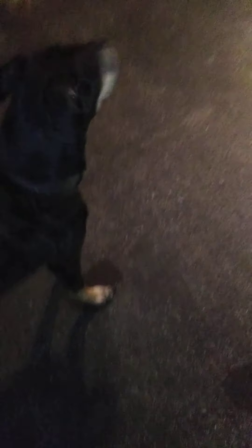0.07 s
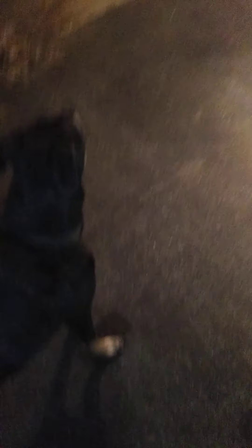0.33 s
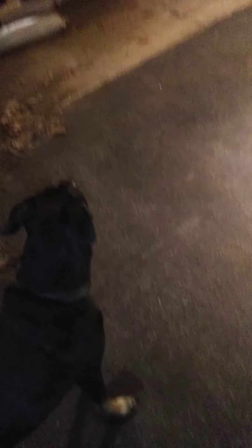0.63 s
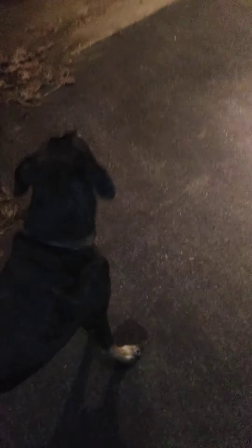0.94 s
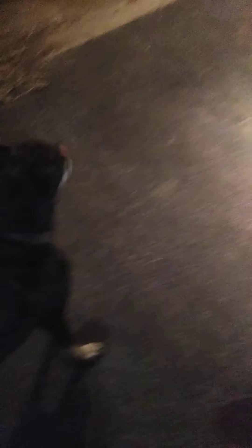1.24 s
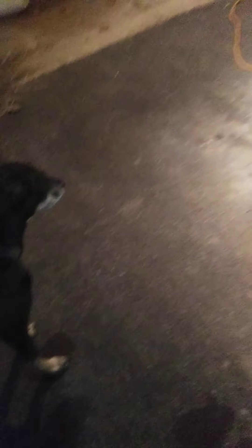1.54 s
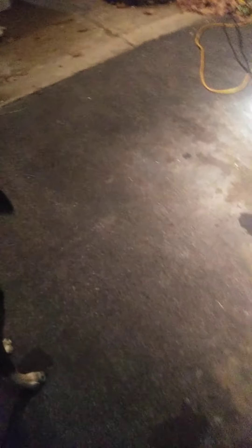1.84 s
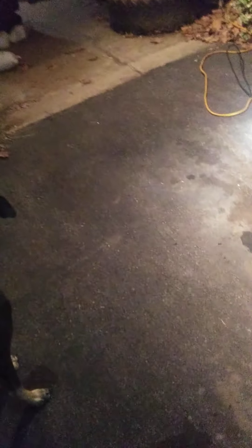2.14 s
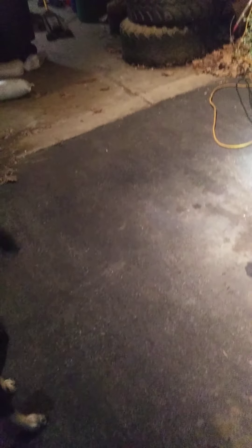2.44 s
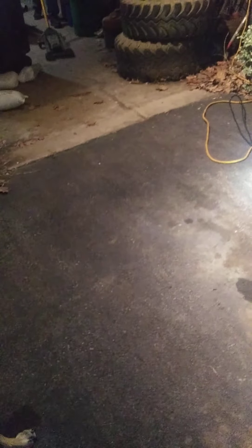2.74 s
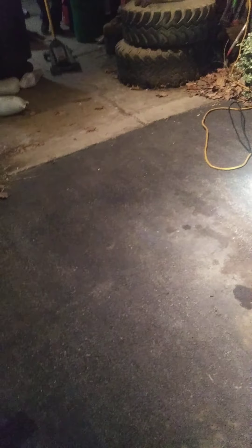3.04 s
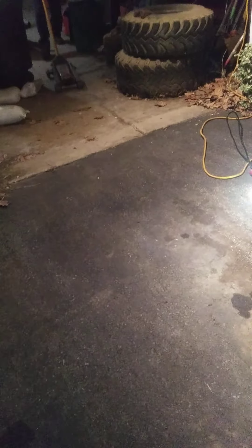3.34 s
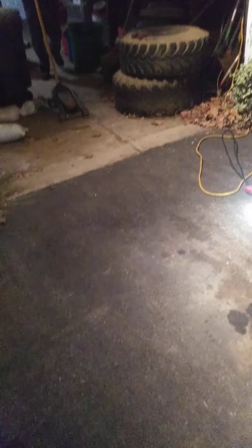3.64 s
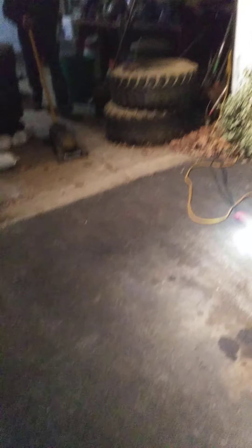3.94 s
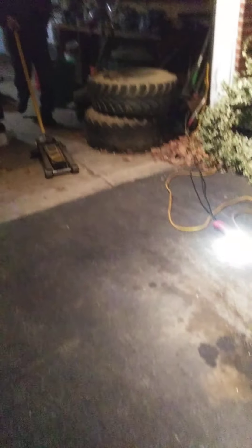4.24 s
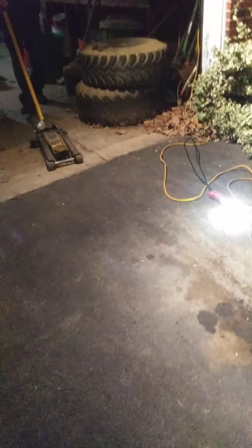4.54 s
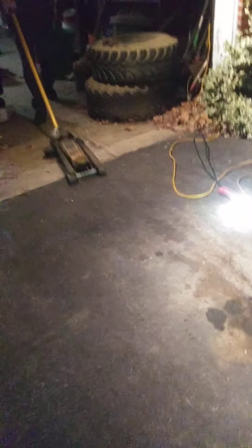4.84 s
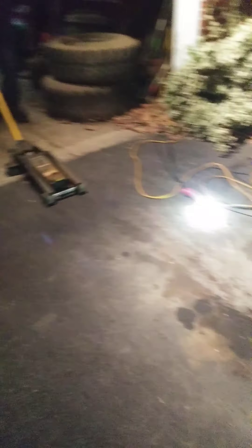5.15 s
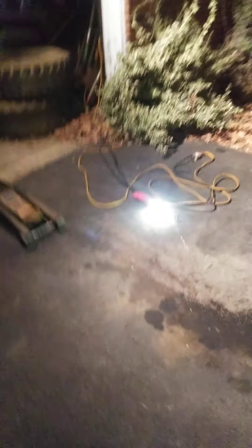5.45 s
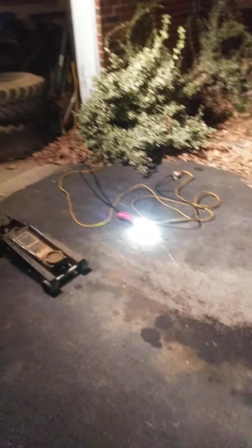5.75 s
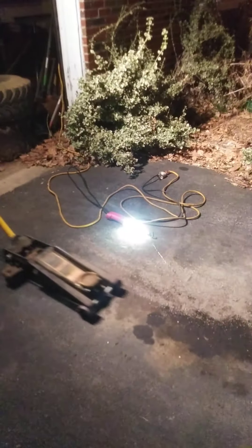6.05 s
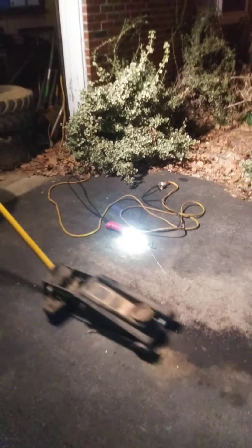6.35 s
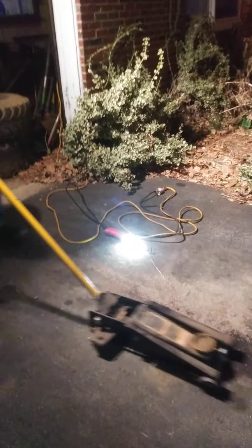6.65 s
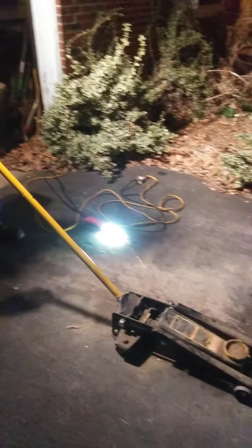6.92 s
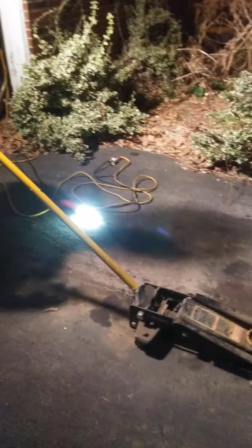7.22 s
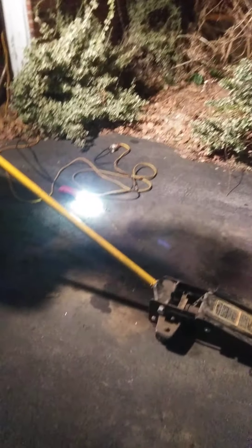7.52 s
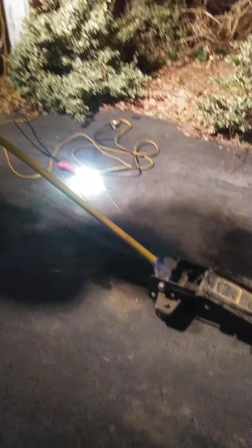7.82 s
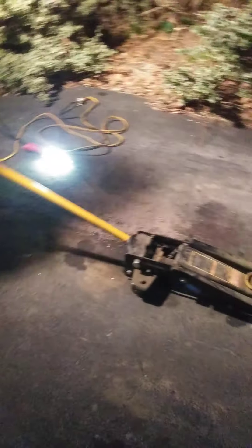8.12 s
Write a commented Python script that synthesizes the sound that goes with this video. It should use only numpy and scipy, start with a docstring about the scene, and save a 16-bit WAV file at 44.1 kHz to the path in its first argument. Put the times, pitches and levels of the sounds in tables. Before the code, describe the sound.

Metal rattling approaches from inside a garage as a floor jack is pushed across concrete and onto asphalt at night. The ringing clatter swells with each push, mixed with clanks, crunching grit and a thin jingle. The echo fades as it comes close and gets loudest. Its swivel wheels chatter, it halts with a knock, and faint ticks lead to one sharp click against a quiet, far traffic murmur.

```python
"""First comes the rattle of a steel floor jack, pushed out of an echoing garage over concrete, then asphalt.
Grit under its four iron wheels shakes the frame, side plates and castors; bumps make loose parts clank.
Stones crunch and a small steel part jingles on the way. The jack turns side-on and stops close by.
Last come a few ticks, a sharp click and the quiet of the night."""
import sys
import numpy as np
from scipy import signal
from scipy.fft import rfft, irfft
from scipy.io import wavfile
from scipy.ndimage import uniform_filter1d, minimum_filter1d

SR = 44100
rng = np.random.default_rng(int(sys.argv[2]) if len(sys.argv) > 2 else 0)


def wav_out(sig):
    """Save sig, one row per channel (or a flat mono array), as 16-bit PCM at SR to the path in sys.argv[1]."""
    wavfile.write(sys.argv[1], SR, np.round(np.clip(np.atleast_2d(sig).T, -1, 1) * 32767).astype(np.int16))


N = 365148
TIME = np.arange(N) / SR
USUAL_DB = -20.5  # shaking at an easy walking pace

# The way out of the garage: time_s, grains_per_s, echo_db, castor_db
ROUTE = [(0, 742, -6, -8), (3.4, 625, -2.5, -9), (4.6, 645, -6, -11), (5.6, 464, -13.5, -11.5),
         (6.6, 450, -19, 0), (7.4, 196, -16.5, -1.5)]
# Small knocks as the jack comes to rest: start_s, level_db
SETTLING_KNOCKS = [(7.476, -3), (7.609, -20.5), (7.622, -21), (7.641, -25), (7.654, -24), (7.666, -19),
                   (8.144, -35)]
def jack():
    """The same grit and bumps shake all the steel parts; hard shaking brings out the frame most."""
    _, frame_db, castor_db = np.transpose(BUMPS)
    road = grains(curve(ROUTE), spread_db=3) * patches() * undb(USUAL_DB)
    bumps = clanks(frame_db)
    settle_s, settle_db = np.transpose(SETTLING_KNOCKS)
    settling = blows(settle_s, undb(settle_db))
    rattle = frame(road, bumps, settling)
    castor_knocks = clanks(castor_db) + settling
    rattle = rattle + plates(road, bumps) + castors(road, castor_knocks)
    return rattle + grit(road, (frame_db + castor_db) / 2)


# The frame's tone (how strong each pitch is): pitch_hz, level_db
FRAME_TONE = [(900, -61.5), (1600, -25), (1900, -3.5), (2300, -0.5), (2750, 4), (2950, -1), (3120, -5),
              (3700, -10), (5500, -41), (12000, -57.5), (16000, -75)]
# Pitches where the frame rings most: pitch_hz, width_hz, boost_db
FRAME_RINGS = [(2070, 70, 1), (2235, 130, 1.5), (2490, 110, 1), (2720, 150, 1), (2887, 140, 2)]
def frame(road, bumps, settling):
    """The frame rings; each ring comes and goes as the load shifts from wheel to wheel."""
    damping = undb(curve(COARSE_GROUND, column=2))
    force = road * shaking(.82) * damping + bumps * undb(-1) + settling
    sound = colour(steel(force, ring_s=.03, tail_s=.27, tail_db=-10.5), FRAME_TONE)
    for hz, width, db in FRAME_RINGS:
        band = signal.lfilter(*signal.iirpeak(hz, hz / width, fs=SR), sound)
        sound = sound + band * (undb(db) * patches(db=.7, per_s=22) - 1)
    return sound


# The side plates' tone: pitch_hz, level_db
PLATE_TONE = [(200, -37), (450, -9.5), (560, -3), (750, -2), (900, -1.5), (1100, -3), (1550, -4),
              (1750, -1.5), (2600, -28.5), (5000, -44.5), (16000, -65)]
# Their rings from the front and from the side: pitch_hz, width_hz, boost_db
PLATE_FRONT_RINGS = [(760, 43, 3.2), (1020, 130, 5.7), (1278, 130, 6), (1460, 100, 3.7)]
PLATE_SIDE_RINGS = [(690, 120, 8.9), (1056, 160, 9.5), (1243, 220, 12), (1530, 330, 7.8)]
def plates(road, bumps):
    """The side plates ring lower than the frame; side-on, their side ring takes over."""
    side = side_on()
    force = (road * shaking(.54) * undb(-7) + bumps * undb(-12)) * undb(-1.5 * side)
    ringing = steel(force, ring_s=.038, tail_s=.18, tail_db=-1)
    front = colour(ringing * undb(-5.5 * side), PLATE_TONE, PLATE_FRONT_RINGS)
    return front + colour(ringing * side * undb(6.5), PLATE_TONE, PLATE_SIDE_RINGS)


# The tone of the castors (the wheels that swivel): pitch_hz, level_db
CASTOR_TONE = [(1500, -44), (3000, -20.5), (3800, -2.5), (4400, -2), (5200, -4), (6100, -7), (6600, -12),
               (7200, -11.5), (7900, -22.5), (9000, -22.5), (11000, -31), (16000, -39)]
# Rings of the castors and of their swivels: pitch_hz, width_hz, boost_db
CASTOR_RINGS = [(4620, 82, 3.1), (5150, 90, 3), (7600, 70, 4)]
SWIVEL_RINGS = [(3950, 350, 5.3), (4350, 1000, 14), (4680, 100, 5), (5200, 460, 5.6)]
def castors(road, knocks):
    """The castors rattle brightly; side-on, the chatter of their swivels stands out."""
    side = side_on()
    force = road * shaking(.74) * undb(curve(ROUTE, column=3)) + knocks
    ringing = steel(force, ring_s=.021, tail_s=.1, tail_db=-7)
    chatter = steel(force * side ** 3 * undb(-.5), ring_s=.025, tail_s=.12, tail_db=-10.5, size=4096)
    front = colour(ringing * undb(-5.5 * side), CASTOR_TONE, CASTOR_RINGS)
    return front + colour(chatter, CASTOR_TONE, SWIVEL_RINGS)


# Blows from bumps and joints in the ground: start_s, frame_db, castor_db
BUMPS = [(1.169, 2, -2), (1.505, 9, -17), (1.581, 8.5, -17), (2.098, -18, -1), (2.24, 3, -8),
         (2.995, 4, -5), (3.185, 6.5, -1.5), (3.535, 7, -6), (3.548, 2, -9), (3.661, 14, 1), (3.672, 5, -1),
         (3.727, 8, -6), (3.78, 5.5, -17), (3.908, 13.5, 2.5), (3.92, -1, -10), (3.989, 13.5, 0),
         (4.004, 2, -1), (4.103, 9, -11), (4.193, 6, -19), (4.24, 7.5, -15), (4.279, 6, -3), (4.556, 7, -7),
         (4.761, 9.5, 0), (4.782, 10, -2), (4.946, 11, 0), (5.102, 11.5, 0), (5.117, 0, 3.5),
         (5.169, 3.5, -3), (5.2987, 9, -11), (5.335, 11.5, 0), (5.379, 8.5, -2), (5.4479, 17, 1.5),
         (5.48, 8, -8), (5.536, 8, 4), (5.637, 10, -8), (5.702, 13, 0), (5.799, 5, 6), (5.865, 10, 4.5),
         (6.004, 11, -1), (6.217, 12.5, -7), (6.378, 0, 2), (6.451, 3.5, 8.5), (6.522, 9, 13),
         (6.61, 7.5, 1), (6.708, 2.5, 11.5), (6.733, 4, 9), (6.756, 10, 15), (6.809, 5.5, -0.5),
         (6.858, 6.5, 6.5), (6.894, 0, -7.5), (6.917, 5, 4.5), (6.94, 5, 6), (6.998, 10, 11),
         (7.012, 10.5, 0.5), (7.026, 1, 2), (7.055, 9.5, 9.5), (7.091, 7.5, 6), (7.1, 13.5, 13),
         (7.124, 5.5, 6), (7.14, -1, -11), (7.155, 8.5, 13), (7.176, 9, 9), (7.187, 7, 7), (7.206, 1, 9),
         (7.228, 2, 0), (7.248, 14, 9), (7.266, 6, 6), (7.279, 6, 3), (7.287, 14, 8), (7.321, 7, 4),
         (7.332, 2, 3), (7.373, -7, 0), (7.399, 11, 6.5), (7.424, -17, 2), (7.441, 6.5, 8)]
def clanks(db, bounce_s=.0035):
    """Each bump gives a blow and five quick bounces, which die sooner once the jack is slow."""
    times, force = np.array(BUMPS)[:, 0], 0
    bounce_db = np.interp(times, [6.6, 7.2], [-2, -10])
    for k in range(6):
        force = force + blows(times, undb(db + k * bounce_db))[::(-1) ** k]  # swap axles each bounce
        times = times + bounce_s * rng.uniform(.46, 2, len(times))
    return force


# How hard the ground shakes the jack, surging with each push: time_s, level_db
PUSHES = [(0, -28), (.08, -23), (.22, -29.5), (.44, -16.5), (.72, -28), (.97, -30.5), (1.17, -19),
          (1.65, -20.5), (1.8, -24.5), (2.04, -28), (2.16, -21), (2.32, -26), (2.45, -29.5), (2.85, -26),
          (3.1, -23), (3.33, -28.5), (3.5, -18.5), (3.8, -24.5), (4.08, -21.5), (4.26, -28), (4.5, -26),
          (4.72, -21), (5.05, -19.5), (5.3, -16), (5.45, -14.5), (5.75, -10.5), (6.1, -11), (6.47, -13.5),
          (6.8, -19.5), (7.25, -27), (7.45, -41)]
def shaking(growth):
    """A part's gain: it rises by `growth` dB for each dB of shaking, and is 1 at the usual pace."""
    return undb(growth * (curve(PUSHES) - USUAL_DB)) * moving()


def moving(stop_s=7.51, brake_s=.11):
    """1 while the wheels turn, falling to 0 as they stop."""
    return np.clip((stop_s - TIME) / brake_s, 0, 1)


def side_on(start_s=6, end_s=6.82):
    """0 while the jack heads for the listener, 1 once it has turned side-on."""
    return np.interp(TIME, [start_s, end_s], [0, 1])


# Clacks of the swivels: start_s, level_db, pitch_hz
SWIVEL_CLACKS = [(6.859, -8, 4420), (6.92, -16, 4380), (6.94, -18, 4740), (6.999, -10, 4420),
                 (7.011, -15, 4200), (7.055, -12, 4140), (7.101, -18, 4300), (7.156, -16.5, 4950),
                 (7.174, -16, 4690), (7.187, -17, 4680), (7.206, -20, 4270), (7.248, -18, 4300),
                 (7.281, -11, 4320), (7.321, -22, 3980), (7.331, -10, 4280), (7.399, -27, 4732),
                 (7.442, -22, 4680)]
# The notes in one clack: pitch_ratio, level_db, ring_s
SWIVEL_NOTES = [(1, 0, .04), (1.085, -8, .022), (.93, -9, .022)]
def swivels():
    """The swivels clack as the jack slows, each time at another angle and so another pitch."""
    out = np.zeros(N)
    for start_s, db, hz in SWIVEL_CLACKS:
        notes = [(hz * ratio, note_db, ring_s) for ratio, note_db, ring_s in SWIVEL_NOTES]
        add(out, start_s, chime(undb([db]), notes))
    return out


# Sand along the way: time_s, grinding_db, single_cracks_db
SAND = [(0, -45, -42), (.35, -32.5, -36), (1, -38, -44), (1.3, -31.5, -44), (2.4, -34, -43),
        (3.4, -41, -50), (3.9, -18, -24), (4.8, -14, -35.5), (5.4, -22.5, -36.5), (6.2, -36, -37.5),
        (6.7, -22, -27), (7.3, -24.5, -31.5)]
# The sand's tone: pitch_hz, level_db
SAND_TONE = [(2500, -12), (6000, -6.5), (8500, -5), (10500, -9), (11500, -10.5), (13500, -13.5),
             (16000, -20)]
def grit(road, bump_db):
    """Streaks of sand grind under the rims; single grains crack, most of all under a clank."""
    cracks = grains(130, spread_db=9) * undb(USUAL_DB + curve(SAND, column=2))
    grinding = road * undb(curve(SAND)) * patches(db=3.5, per_s=18)
    force = (cracks + grinding) * shaking(.85) + clanks(bump_db - 18.5)
    return colour(steel(force, ring_s=.007, tail_s=.07, tail_db=-20), SAND_TONE)


# Small stones crushed under a rim: start_s, level_db, pitch_hz, fade_s
STONES = [(.041, -40, 5500, 0.11), (.1, -39, 5900, .08), (.299, -21, 4600, 0.078), (.324, -28, 6100, .05),
          (.3735, -23, 5200, .05), (.433, -30, 4600, 0.11), (.523, -27, 6100, 0.09),
          (.543, -25, 6200, 0.06), (.578, -31, 8300, .05), (.959, -32, 4500, .05), (1.088, -29, 5800, .05),
          (1.1992, -27, 7300, .07), (1.3319, -29, 5600, 0.1), (1.3912, -30, 6400, .05),
          (1.508, -29, 4800, 0.053), (1.6826, -28, 5800, .05), (1.948, -24, 5900, 0.08),
          (2.123, -24, 5670, .05), (2.176, -26, 4700, .05), (2.4034, -31, 7100, .06), (3.6, -30, 5900, .04),
          (4.95, -24.5, 5900, 0.05), (5.353, -20, 5200, .03), (5.6169, -23, 6100, .03),
          (5.747, -15, 5500, .03), (5.83, -15, 4700, 0.047), (5.864, -15, 6000, .025),
          (5.897, -16.5, 8200, 0.046), (5.9731, -23, 8400, .03), (6.004, -19.5, 5850, 0.027),
          (6.031, -20, 6150, 0.028), (6.089, -20.5, 4500, 0.035), (6.263, -19.5, 4500, 0.045),
          (6.291, -16, 4594, .03), (6.3138, -18, 7500, .025), (6.378, -16, 6200, .03),
          (6.4495, -5.5, 6100, .025), (6.473, -15.5, 6100, .05), (6.544, -10, 4700, .035),
          (6.57, -14, 4600, 0.05), (6.61, -18, 6950, .03), (6.655, -7, 4700, .03),
          (6.699, -11, 6300, 0.033)]
# The tone all the stones share: pitch_hz, level_db
STONE_TONE = [(1500, -22.5), (4000, 1), (7000, 0.5), (10000, -10.5), (13000, -14.5), (16000, -24.5)]
def crunches(ragged_db=5, width_hz=900, boost_db=13.5, size=6144):
    """Each stone breaks in a short, ragged spurt of tiny cracks around its own pitch."""
    out = np.zeros(N)
    for start_s, db, hz, fade_s in STONES:
        noise = rng.standard_normal(size)
        flicker = unit(uniform_filter1d(rng.standard_normal(size), size=48))
        spurt = unit(noise * undb(ragged_db * flicker)) * fade(fade_s, size) * undb(db)
        add(out, start_s, colour(spurt, STONE_TONE, [(hz, width_hz, boost_db)]))
    return out


# Coarse ground scrapes the rims and damps the frame: time_s, scrape_db, frame_db
COARSE_GROUND = [(0, -26.5, 0.5), (.35, -23.5, -3), (.9, -54.5, -2.5), (1.4, -25, -2), (2.3, -29, 1.5),
                 (3.2, -42, -2.5), (3.7, -32, 0.5), (4.3, -25.5, 0), (5.5, -31, -0.5), (6.5, -33, 0.5),
                 (7.2, -34.5, -2)]
# The scrape's tone: pitch_hz, level_db
SCRAPE_TONE = [(700, -32.5), (1400, -1.5), (2000, 2.5), (3200, -3), (4300, -2), (6000, -12), (8000, -22),
               (16000, -43.5)]
def scrape():
    """Fine grains grind dryly under the iron rims; bumps add a clatter."""
    grinding = grains(1800, spread_db=1) * patches() * shaking(.73) * undb(curve(COARSE_GROUND))
    clatter = clanks(np.array(BUMPS)[:, 1] - 12)
    rasp = steel(grinding + clatter, ring_s=.0032, tail_s=.04, tail_db=-14.5, size=2048)
    return colour(rasp, SCRAPE_TONE)


# The handle's hum at the usual shaking: time_s, level_db
HANDLE_HUM = [(0, -34.5), (1.2, -54), (2.1, -43.5), (2.5, -37), (3.5, -39), (4.1, -45.5), (5.2, -37.5),
              (6.3, -36), (6.75, -32), (7.2, -43)]
# The handle's ring: pitch_hz, width_hz, boost_db
HANDLE_RINGS = [(337, 50, 5)]
# Tones of the handle and the wheels: pitch_hz, level_db
HANDLE_TONE = [(150, -48.5), (300, -15), (340, 3.5), (380, -8), (700, -40)]
WHEEL_TONE = [(60, -27.5), (140, -20), (200, -5), (270, 0), (320, 2), (400, -6), (700, -8), (2000, -48.5)]
def rumble(boom_per_echo_db=.74):
    """The long handle hums and the wheels drum on the ground, booming inside the garage."""
    handle, wheels = grains(curve(ROUTE) * 2, spread_db=2.5)
    hum = handle * shaking(.27) * undb(curve(HANDLE_HUM))
    drum = wheels * shaking(.4) * undb(-31.5 + boom_per_echo_db * curve(ROUTE, column=2))
    return colour(hum, HANDLE_TONE, HANDLE_RINGS) + colour(drum, WHEEL_TONE)


# Throws of a small steel part, a level per pair of notes: start_s, low_db, middle_db, top_db
JINGLE_THROWS = [(.707, -51, -60, -75), (.9, -53, -75, -80), (1.06, -47, -55, -77), (1.85, -47, -70, -72),
                 (1.99, -50, -46, -68), (2.11, -52, -54, -75), (2.36, -49, -64, -77),
                 (2.584, -47, -62, -75), (2.63, -47, -62, -61), (2.88, -51, -62, -66),
                 (2.94, -46, -62, -64), (2.996, -39, -48, -45), (3.025, -45, -47, -53),
                 (3.077, -42, -51, -57), (3.18, -42, -54, -62), (3.259, -39, -60, -72),
                 (3.37, -58, -58, -66), (3.465, -52, -60, -66), (3.618, -39, -44, -54),
                 (3.705, -40, -56.5, -62), (3.745, -40, -54, -62), (3.822, -37, -40, -62),
                 (3.855, -36, -47, -62), (4.045, -46, -56, -45), (4.096, -35, -50, -60),
                 (4.1685, -27.5, -45, -54), (4.215, -49, -52, -60), (4.3, -42, -52, -60),
                 (4.335, -49, -54, -58), (4.389, -37, -32, -51), (4.425, -43, -46, -56)]
# Its six notes: pitch_hz, level_db, ring_s
JINGLE_NOTES = [(9660, 3, 0.093), (10100, 0.5, 0.11), (12371, -7.5, .12), (12682, 0, .11),
                (15542, 0.5, .12), (15610, -8, .1)]
# Its steady shiver: time_s, level_db
SHIVER_LEVELS = [(0, -75), (1.7, -64), (2.1, -58), (3.1, -52.5), (3.8, -47), (4.4, -41.5), (4.6, -47.5),
                 (7.4, -69.5)]
# The shiver's tone: pitch_hz, level_db
SHIVER_TONE = [(7000, -35), (9000, -19), (9500, -2), (10100, -4), (10500, -23), (11500, -28), (12500, -17),
               (13500, -29.5), (15600, -34)]
# The shiver's rings: pitch_hz, width_hz, boost_db
SHIVER_RINGS = [(9660, 110, 5), (10040, 110, 7), (12371, 50, 13), (12682, 50, 25), (15542, 90, 18)]
def jingle(scatter_db=3):
    """A loose steel part shivers; each throw against its seat rings another mix of its notes."""
    times, *pair_db = np.transpose(JINGLE_THROWS)
    force = grains(120, spread_db=4) * undb(curve(SHIVER_LEVELS)) * moving()
    scatter = scatter_db * rng.uniform(-1, 1, (len(times), len(JINGLE_NOTES))).T
    note_db = np.repeat(pair_db, 2, axis=0) + scatter
    throws = sum(strike(times, db, [note]) for db, note in zip(note_db, JINGLE_NOTES))
    shiver = steel(force, ring_s=.04, tail_s=.15, tail_db=-3.5)
    return throws + colour(shiver, SHIVER_TONE, SHIVER_RINGS)


# The scuff's tone: pitch_hz, level_db
SCUFF_TONE = [(3000, -40), (6000, 11), (9000, 1), (12000, -8), (15500, -14)]
def scuff(start_s=.74, rise_s=.017, hold_s=.115, fall_s=.018):
    """Something slides briefly over the gritty ground."""
    swell = np.interp(TIME, start_s + np.cumsum([0, rise_s, hold_s, fall_s]), [0, 1, 1, 0])
    return colour(grains(8200, spread_db=3, contacts=1)[0] * swell * undb(-38.5), SCUFF_TONE)


# Dry ticks and the last click: start_s, level_db
LAST_TICKS = [(7.7706, -26), (7.886, -27), (8.0426, -35), (8.145, -45), (8.267, -5.5)]
# Tones of the ticks and of a faint hiss: pitch_hz, level_db
TICK_TONE = [(200, -12.5), (1200, 7), (3000, 0), (6000, 4.5), (8500, -7.5), (12500, -25), (16000, -40)]
HISS_TONE = [(3500, -30), (5000, -9), (5650, 2), (6400, -9), (8000, -28)]
# Notes of a small ping and of the settling frame: pitch_hz, level_db, ring_s
PING_NOTES = [(9800, -9, .25), (10840, -2, 0.021), (10840, 7, 0.056), (11450, -4, .025), (11900, -5, .035)]
SETTLING_NOTES = [(2500, -6, .4), (2690, -6, .7)]
def at_rest(hiss_start_s=7.76, hiss_length_s=.36):
    """After the stop: a ping, ticks, a faint hiss, a soft ring as the frame settles, and a click."""
    ping = strike(times_s=[7.665], db=-46, notes=PING_NOTES)
    frame_ring = strike(times_s=[8.145], db=-57, notes=SETTLING_NOTES)
    swell = np.sin(np.pi * np.clip((TIME - hiss_start_s) / hiss_length_s, 0, 1))
    hiss = colour(rng.standard_normal(N) * swell * undb(-65), HISS_TONE)
    times, db = np.transpose(LAST_TICKS)
    ticks = steel(blows(times, undb(db), contacts=1), ring_s=.0044, tail_s=.053, tail_db=-31)
    return ping + frame_ring + hiss + colour(ticks, TICK_TONE)


def garage(sound, ring_s=1.0, treble_ring_s=.5, split_hz=3200, delay_s=.012, dull_hz=6000):
    """The walls give a dull echo, strongest while the jack is inside; its treble dies first."""
    decay = fade(ring_s)
    noise = rng.standard_normal(len(decay))
    low = signal.sosfilt(signal.butter(4, split_hz, fs=SR, output="sos"), noise)
    response = (decay * low + fade(treble_ring_s) * (noise - low)) / np.linalg.norm(decay)
    response[:int(delay_s * SR)] = 0
    echo = ring(sound * undb(curve(ROUTE, column=2)), response)
    return signal.sosfilt(signal.butter(2, dull_hz, fs=SR, output="sos"), echo)


# The tone of far traffic: pitch_hz, level_db
TRAFFIC_TONE = [(35, -73.5), (60, -44), (91, -41.5), (190, -17), (282, -18), (438, -4), (648, -6),
                (762, -1), (1670, -19.5), (4310, -35), (5430, -32), (8230, -37), (15000, -39.5)]
# A faint, far drone: pitch_hz, width_hz, boost_db
FAR_DRONE = [(810, 56, 3.3)]
def traffic():
    """Far traffic blurs into a steady murmur in the night."""
    return colour(rng.standard_normal(N), TRAFFIC_TONE, FAR_DRONE) * undb(-49.5)


def undb(db):
    """Turn decibels into a gain to multiply by."""
    return 10 ** (np.asarray(db) / 20)


def curve(rows, column=1):
    """One column of a table, joined by straight lines in time."""
    rows = np.array(rows)
    return np.interp(TIME, rows[:, 0], rows[:, column])


def unit(x):
    """Scale to an average power of 1."""
    return x / np.sqrt(np.mean(x ** 2))


def fade(ring_s, size=22050):
    """Die away by 60 dB in ring_s seconds."""
    return np.exp(-np.log(1000) * np.arange(size) / SR / ring_s)


def ring(x, response):
    """Play x through an object, given its response to one tap."""
    return signal.oaconvolve(x, response)[:N]


def add(out, start_s, sound):
    """Mix a sound in at its time."""
    part = out[int(start_s * SR):][:len(sound)]
    part += sound[:len(part)]


def colour(x, tone, rings=(), size=4096):
    """Shape a sound with a broad tone and rings on top; white noise keeps its power."""
    hz = np.arange(size // 2 + 1) * SR / size
    tone_hz, tone_db = np.transpose(tone)
    db = np.interp(np.log(hz + 1), np.log(tone_hz), tone_db)
    for centre, width, boost in rings:
        db = db + boost / (1 + (2 * (hz - centre) / width) ** 2)
    cepstrum = irfft(np.log(undb(db)))  # keeping its first half puts the ringing after the blow
    response = irfft(np.exp(rfft(2 * cepstrum[:size // 2], size)))
    return ring(x, response / np.linalg.norm(response))


def blows(times_s, sizes, contacts=2):
    """Sharp taps, dealt in turn to the contact points."""
    force = np.zeros((contacts, N))
    samples = np.clip((np.asarray(times_s) * SR).astype(int), 0, N - 1)
    np.add.at(force, (np.arange(len(samples)) % contacts, samples), sizes)
    return force


def grains(per_s, spread_db, contacts=2):
    """Random taps at each contact point, mostly small and a few large."""
    force = (rng.random((contacts, N)) < per_s / SR / contacts) / np.sqrt(per_s)
    hit = force > 0
    sizes = np.minimum(-np.log(rng.random((contacts, N))[hit]), 3)
    force[hit] *= undb(spread_db * sizes) * (-1) ** np.arange(len(sizes))
    return unit(force) / np.sqrt(contacts)


def patches(db=1.35, per_s=28):
    """A gain that wanders at random, as over rough and smooth patches of ground."""
    size = int(SR / per_s)
    steps = np.repeat(rng.standard_normal(N // 500)[:N // size + 1], size)[:N]
    return undb(db * uniform_filter1d(steps, size // 4))


def steel(forces, ring_s, tail_s, tail_db, size=8192):
    """Struck steel rings with many notes: most die fast, some linger, and the mix keeps changing."""
    decay = fade(ring_s, size) + undb(tail_db) * fade(tail_s, size)
    out = np.zeros(N + 2 * size)
    for k, force in enumerate(forces):
        edges = np.r_[0, np.arange((k + 1) * size // len(forces), N, size), N]
        for a, b in zip(edges, edges[1:]):
            response = decay * rng.standard_normal(size)
            out[a:b + size - 1] += signal.fftconvolve(force[a:b], response / np.linalg.norm(response))
    return out[:N]


def chime(force, notes, size=11025):
    """A force rings a few clear, fading notes."""
    response = sum(undb(db) * fade(ring_s, size) * np.sin(2 * np.pi * hz * TIME[:size])
                   for hz, db, ring_s in notes)
    return ring(force, response)


def strike(times_s, db, notes):
    """Tap clear notes at the given times."""
    return chime(blows(times_s, undb(db), contacts=1)[0], notes)


def scene():
    """The jack and its echo, over the far murmur of traffic."""
    direct = jack() + swivels() + crunches() + scrape() + rumble() + jingle() + scuff() + at_rest()
    night = traffic()
    return (direct * undb(-2.5) + garage(direct) * undb(-8.5) + night)[None]


def record(dry, low_cut_hz=130, top_hz=15700, limit=.61, ratio=10, release_s=.016):
    """A phone cuts the deep bass and the top; its limiter grabs peaks, so the loudest rattle judders."""
    thin = signal.sosfilt(signal.butter(3, low_cut_hz, "high", fs=SR, output="sos"), dry)
    excess = np.log(np.maximum(np.abs(thin) / limit, 1))
    held = np.maximum.accumulate(excess + TIME / release_s) - TIME / release_s  # grab, then let go
    held = uniform_filter1d(-minimum_filter1d(-held, size=14), size=14)  # widen and smooth each grab
    limited = thin * np.exp(-held * (1 - 1 / ratio))
    return signal.sosfilt(signal.ellip(10, .2, 80, top_hz, fs=SR, output="sos"), limited)


dry = scene()
out = record(dry)
wav_out(out)
```